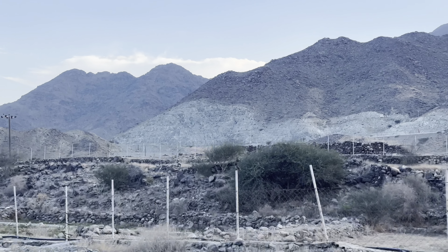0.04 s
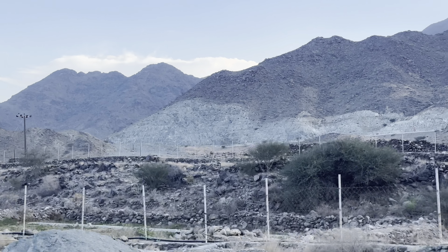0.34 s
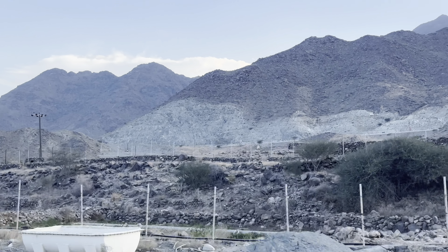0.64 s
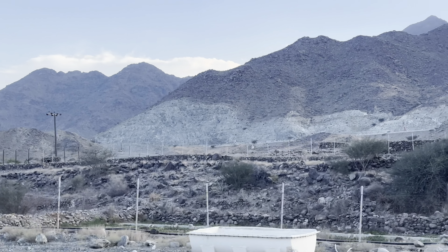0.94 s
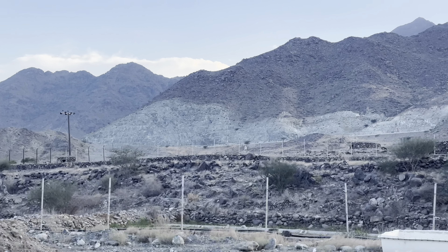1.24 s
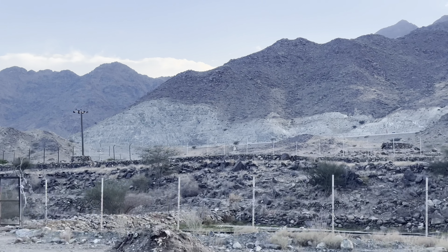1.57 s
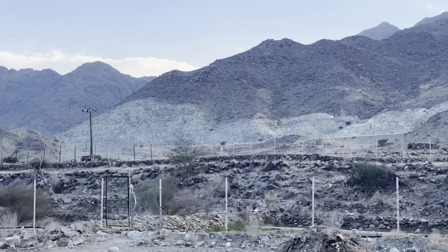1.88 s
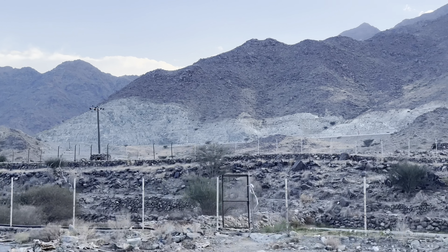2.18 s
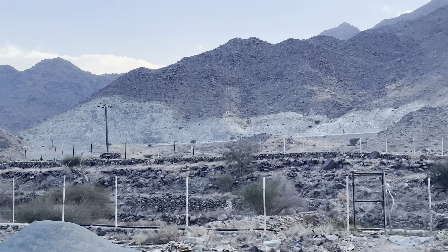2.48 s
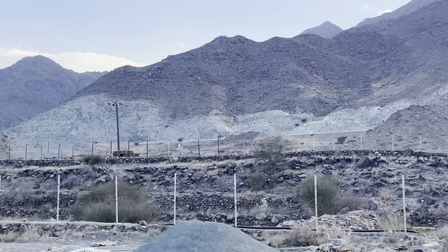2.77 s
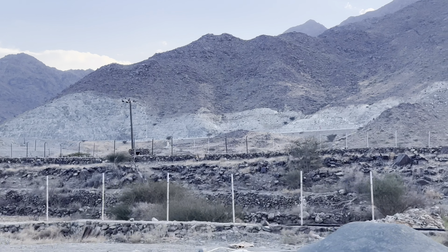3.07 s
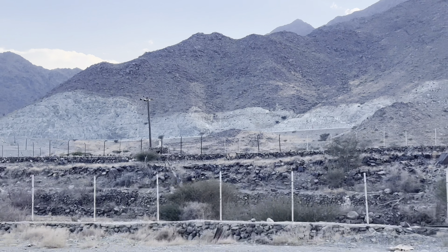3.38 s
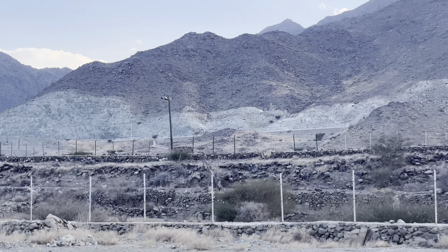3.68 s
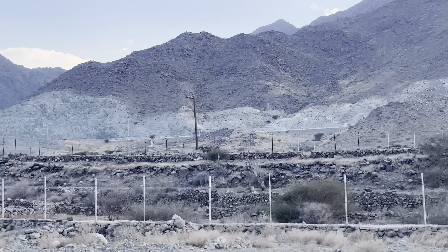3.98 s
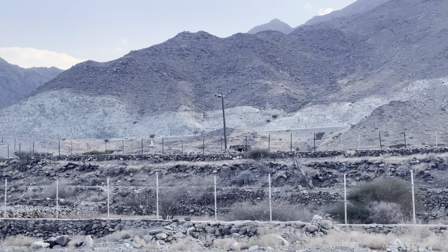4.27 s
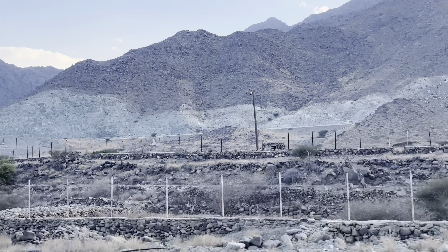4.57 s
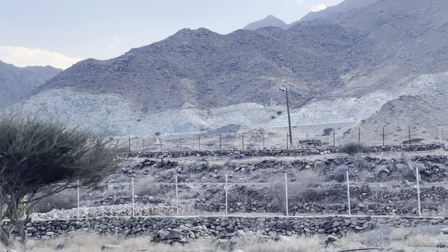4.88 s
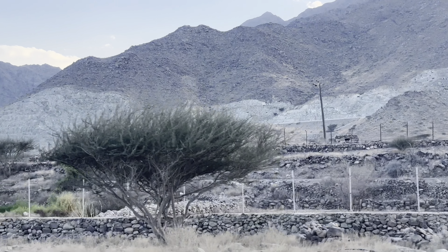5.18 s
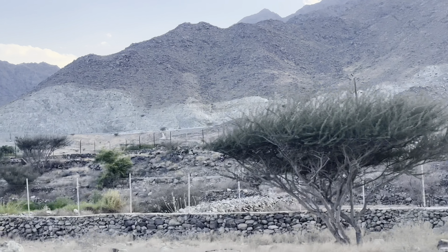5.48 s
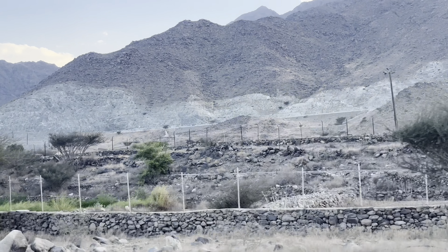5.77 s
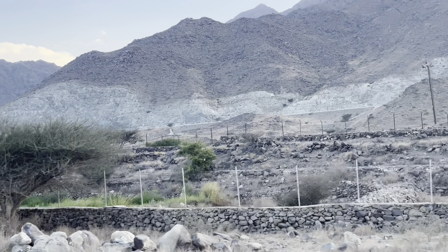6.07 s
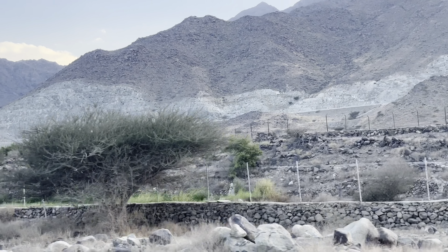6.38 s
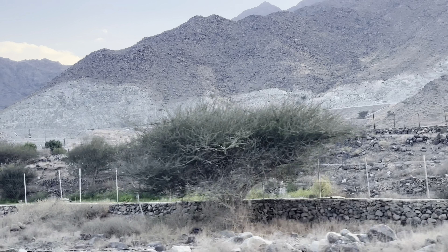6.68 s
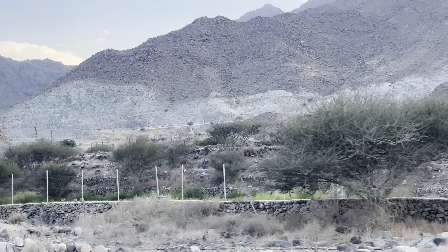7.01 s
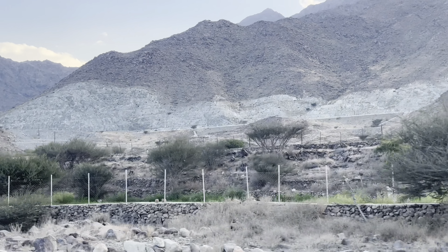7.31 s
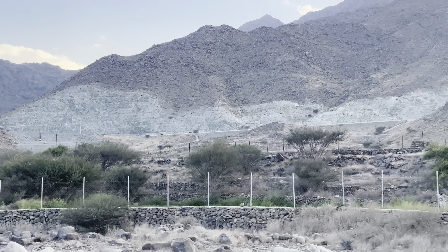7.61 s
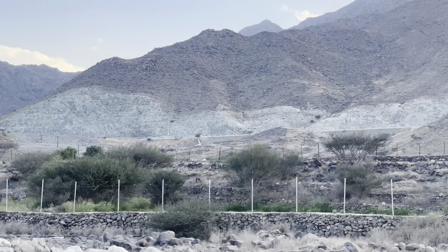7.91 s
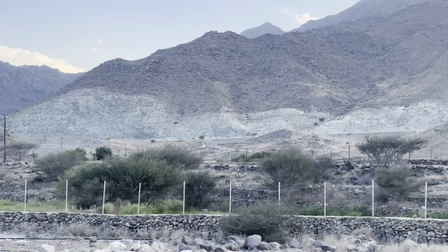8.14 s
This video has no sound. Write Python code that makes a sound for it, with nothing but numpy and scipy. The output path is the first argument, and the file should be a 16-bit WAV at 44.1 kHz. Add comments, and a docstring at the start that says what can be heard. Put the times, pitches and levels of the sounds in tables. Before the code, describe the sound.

Air rushes through an open car window, fluttering and thumping against the microphone, with faint road rumble underneath.

```python
"""Wind buffeting in a moving car

Turbulent air pours through an open window and over the two ports of a microphone. Each eddy is a
pressure fluctuation whose duration follows its size: large slow ones thump, middling ones roar, small
fast ones crack, and the rest merge into a ragged flutter. The car's steady rumble and hiss lie beneath."""
import sys
import numpy as np
from scipy import signal
from scipy.io import wavfile
from scipy.ndimage import uniform_filter1d

SR = 44100
rng = np.random.default_rng(int(sys.argv[2]) if len(sys.argv) > 2 else 0)


def store_pcm(level_fs):
    """Save levels as 16-bit WAV."""
    pcm = np.round(np.clip(level_fs, -1, 1) * 32767).astype(np.int16)
    wavfile.write(sys.argv[1], SR, np.atleast_2d(pcm).T)


N = 363809
BAND_HZ = 31 * 2 ** (np.arange(19) / 2)   # half-octave centres
OPPOSED = np.array([[1], [-1]])   # opposite signs at the left and right ports


def from_db(db):
    """Amplitude ratio of a level in decibels."""
    return 10 ** (np.asarray(db) / 20)


def rms_one(x):
    """Normalisation to unit root-mean-square amplitude."""
    return x / np.sqrt(np.mean(x ** 2) + 1e-20)


def at_hz(table, hz):
    """Interpolation on a logarithmic frequency axis."""
    frequencies, values = np.transpose(table)
    return np.interp(np.log(hz), np.log(frequencies), values)


def drift(corner_hz):
    """A slow random fluctuation: low-pass noise of unit rms."""
    pole = np.exp(-20 * np.pi * corner_hz / SR)   # at a tenth of the sample rate
    slow = signal.lfilter([1], [1, -2 * pole, pole * pole], rng.standard_normal(N // 10 + 4002))[4000:]
    return np.interp(np.arange(N) / 10, np.arange(len(slow)), rms_one(slow))


def swell(s, length, rise=.75):
    """An eddy's envelope, Gaussian rise and sech decay: (samples, time from peak, amplitude)."""
    at = np.arange(max(int((s - 2 * length) * SR), 0), min(int((s + 4 * length) * SR), N))
    t = at / SR - s
    growth = np.exp(-np.pi / 2 * (t / (rise * length)) ** 2)
    decay = 1 / np.cosh(np.pi / 2 * t / length)
    return at, t, np.where(t < 0, growth, decay)


def wind_gain(spectrum, hz, edge_hz=1900, db_per_octave=21):
    """Spectral roll-off: slow air makes little treble, so its spectrum falls steeply above an edge."""
    return from_db(at_hz(spectrum, hz) - db_per_octave * max(np.log2(hz / edge_hz), 0))


# Likeness of the sound at the two ports: (frequency [Hz], correlation [-])
PORT_CORRELATION = [(40, -0.1), (110, -0.18), (300, 1), (700, 0.51), (1400, 0.91), (3000, 1), (15000, .93)]
def band_noise(white, hz, strength):
    """Partial coherence: in-phase and antiphase noise mix into a half-octave stereo band."""
    alike = np.clip(at_hz(PORT_CORRELATION, hz), -1, 1)
    drive = np.sqrt((1 + alike) / 2) * white[0] + np.sqrt((1 - alike) / 2) * white[1] * OPPOSED
    low, high = hz * 2 ** np.array([-.25, .25])
    band = signal.butter(3, [low, high], "band", fs=SR, output="sos")
    return signal.sosfilt(band, drive * strength) * np.sqrt(SR / 2 / (high - low))


# Spectrum of tyres, engine and air in the cabin: (frequency [Hz], half-octave level [dB])
CABIN_SPECTRUM = [(31, -38), (62, -52), (125, -49), (250, -66), (550, -70), (1100, -61), (2000, -85),
                  (4200, -71), (8000, -81.5)]
def cabin_power(hz):
    """Stationary noise: the moving car supplies a constant power to each band."""
    return from_db(at_hz(CABIN_SPECTRUM, hz)) ** 2


def whiff(peak_s=1.11, level_db=-61, length_s=.05, low_hz=3500):
    """Amplitude-modulated high-pass noise: a thin hiss of air swells once."""
    at, _, bell = swell(peak_s, length_s)
    strength = np.zeros(N)
    strength[at] = from_db(level_db) * bell
    highpass = signal.butter(2, low_hz, "high", fs=SR, output="sos")
    return strength * signal.sosfilt(highpass, rng.standard_normal(N))


# Brief drops in the wind: (time [s], depth [dB], duration [s])
LULLS = [(0.133, 20, 0.046), (0.409, 17, 0.023), (0.616, 9, 0.018), (1.99, 16, 0.048), (4.536, 12.5, 0.066),
         (4.675, 13, 0.024), (4.99, 17, 0.033), (5.51, 26, 0.019), (7.348, 9, 0.055), (7.82, 8, 0.0081)]
def lull_db(s):
    """Intermittency: each lull is a Gaussian dip in level."""
    return -sum(depth * np.exp(-np.pi * ((s - centre) / length) ** 2) for centre, depth, length in LULLS)


def stirring_db(eddies, gather_s=0.0033, gather_db=2):
    """Clustering of turbulence: the flutter gathers around cracks and thumps and thins in the lulls."""
    near = np.zeros(N)
    for s, db, *_ in [*eddies, *THUMPS]:
        at, _, bell = swell(s, gather_s, rise=.3)
        near[at] += from_db(db) * bell
    return gather_db * np.tanh(near / near.mean()) + lull_db(np.arange(N) / SR)


# The draught through the window: (time [s], buffeting level [dB], roar level [dB], rasp level [dB])
DRAUGHT = [(0.0, -16.5, -26.5, -26.5), (0.35, -20.5, -32, -31), (0.85, -20, -27, -34),
           (1.03, -25.5, -29.5, -35.5), (1.6, -21, -33, -32), (2.0, -19, -27, -31.5), (2.35, -27, -31, -39),
           (2.85, -21, -34, -34.5), (3.3, -20.5, -28, -32), (3.701, -22, -28.5, -32.5),
           (4.45, -21, -25, -29), (4.62, -26, -29, -30), (5.198, -24.5, -28.5, -32.5),
           (5.85, -24.5, -26.5, -33), (5.998, -20.5, -29, -30), (6.6, -21.5, -24, -35),
           (7.25, -24, -32.5, -30), (7.65, -25, -32.5, -31), (8.25, -25, -27.5, -30.5)]
# Flutter spectrum, relative to the draught: (frequency [Hz], half-octave level [dB])
FLUTTER_SPECTRUM = [(31, -23), (44, -10.5), (68, -2), (125, -7.5), (235, -12), (410, -5.5), (1050, -10),
                    (1950, -14)]
# Modulation depth; the treble follows air speed most steeply: (frequency [Hz], level spread [dB])
FLUTTER_DEPTH = [(50, 2.8), (200, 4.6), (600, 4.9), (1500, 7), (3000, 9.5), (7000, 11)]
def flutter(hz, swirl, shove, stir_db, own_share=0.057):
    """Turbulent modulation of one band: the bass follows slow shoves, the treble the quick swirl."""
    times, *levels = np.transpose(DRAUGHT)
    level_db = [np.interp(np.log(hz), np.log([150, 480, 1600]), row) for row in np.transpose(levels)]
    draught = from_db(np.interp(np.arange(N) / SR, times, level_db))
    quick = np.interp(np.log(hz), np.log([125, 950]), [0, 1])
    speed = np.sqrt(quick) * swirl + np.sqrt(1 - quick) * shove + own_share * drift(min(hz / 4, 120))
    surge = from_db(at_hz(FLUTTER_DEPTH, hz) * np.minimum(rms_one(speed), 1.6))
    # the eddies share out the energy that the draught brings
    surge = surge / np.sqrt(uniform_filter1d(surge ** 2, int(.15 * SR)))
    return surge * rms_one(from_db(stir_db)) * draught * wind_gain(FLUTTER_SPECTRUM, hz)


# Middling eddies that roar past: (time [s], level [dB], duration [s])
GUSTS = [(0.305, -19, 0.019), (0.342, -17.5, 0.017), (0.507, -15.5, 0.019), (0.752, -23, 0.034),
         (0.925, -13, 0.0059), (1.143, -17, 0.0063), (2.335, -16.5, 0.017), (2.371, -21, 0.013),
         (2.393, -17, 0.01), (2.499, -13.5, 0.01), (2.576, -18.5, 0.013), (2.608, -17.5, 0.021),
         (2.735, -23, 0.01), (2.782, -10.5, 0.016), (2.851, -15.5, 0.015), (2.894, -13.5, 0.0076),
         (2.918, -12, 0.01), (3.012, -13.5, 0.0083), (3.059, -11, 0.0061), (3.208, -14, 0.006),
         (3.247, -11, 0.0066), (3.326, -12, 0.0061), (3.5, -19, 0.01), (3.646, -14.5, 0.007),
         (3.7, -22, 0.0075), (3.77, -18, 0.01), (3.821, -15.5, 0.013), (3.887, -17.5, 0.0099),
         (4, -18, 0.023), (4.09, -21.5, 0.013), (4.401, -9, 0.0035), (4.498, -11, 0.0057),
         (4.586, -16.5, 0.0077), (5.122, -13.5, 0.0092), (5.282, -19.5, 0.0077), (5.37, -23.5, 0.03),
         (5.486, -28, 0.02), (5.651, -20.5, 0.012), (5.682, -15, 0.0086), (5.856, -37, 0.0072),
         (5.985, -15.5, 0.023), (6.138, -20.5, 0.046), (6.296, -14.5, 0.0089), (6.364, -19, 0.031),
         (6.486, -22.5, 0.0075), (6.597, -15.5, 0.009), (6.656, -18, 0.012), (7.12, -21.5, 0.023),
         (7.194, -19.5, 0.0096), (7.256, -25, 0.0064), (7.299, -20.5, 0.03), (7.777, -17.5, 0.014),
         (7.948, -19, 0.0051), (7.995, -16, 0.0085)]
def gusts():
    """Convection: the envelope of the roar swells as the flow carries each eddy past."""
    strength = np.zeros(N)
    for s, db, length in GUSTS:
        at, _, bell = swell(s, length, rise=0.51)
        strength[at] += from_db(db) * bell
    return strength


def wakes(eddies, level_db=-1.0, delay_s=0.0022, stretch=0.86):
    """Turbulent wakes: the envelope of the air stirred around each crack peaks just after it."""
    strength = np.zeros(N)
    for s, db, length, _ in eddies:
        at, _, bell = swell(s + delay_s, max(stretch * length, .002), rise=9.8)
        strength[at] += from_db(db + level_db) * bell
    return strength


# Noise spectra, each relative to its gust, wake or thump: (frequency [Hz], half-octave level [dB])
GUST_SPECTRUM = [(31, -38), (150, -14.5), (330, -3.5), (620, -5.5), (1100, -25.5), (2000, -20.5)]
WAKE_SPECTRUM = [(31, -33), (90, -11), (250, -15.5), (550, -9), (1100, -23), (2500, -17)]
THUMP_SPECTRUM = [(31, -50), (70, -13.5), (220, -24.5), (480, -21.5), (1000, -30), (2000, -35.5)]
def eddy_noise_power(hz, gust, wake, thump):
    """Incoherent addition: gusts, wakes and the air torn off by thumps sum in power within a band."""
    sources = (gust, GUST_SPECTRUM), (wake, WAKE_SPECTRUM), (thump, THUMP_SPECTRUM)
    return sum((strength * wind_gain(spectrum, hz)) ** 2 for strength, spectrum in sources)


def shed_eddies(count=400, per_s=38, evenness=2.5, typical_s=0.0023, longest_s=.005, clear_s=0.0027):
    """Vortex shedding: the window edge releases lesser eddies at loosely even gaps; rows as in CRACKS."""
    gap, size, stretch, speed = rng.standard_normal((count, 4)).T
    intervals = np.exp((gap - .5 / np.sqrt(evenness)) / np.sqrt(evenness))   # log-normal, mean of one
    s = np.cumsum(intervals) / per_s
    times, _, _, rasp_db = np.transpose(DRAUGHT)
    over_rasp_db = 3 + 3.5 * np.minimum(size, 1)
    db = np.interp(s, times, rasp_db) + lull_db(s) + over_rasp_db
    length = np.minimum(typical_s * np.exp(0.45 * stretch), longest_s)
    bright_db = -12.5 + 3 * np.minimum(speed, 1.5)
    rows = np.transpose([s, db, length, bright_db])
    # a hard eddy leaves no room for a lesser one close to it
    clear = np.abs(s[:, None] - np.array(CRACKS)[:, 0]).min(axis=1) > clear_s
    return rows[clear & (s < N / SR)]


def splinters(level_db=-11):
    """Eddy break-up: a weaker, shorter tick trails each hard crack by 3 to 12 ms; rows as in CRACKS."""
    s, db, length, bright_db = np.transpose(CRACKS)
    delay_s = rng.uniform(.003, .012, len(s))
    rows = np.transpose([s + delay_s, db + level_db, length / 2, bright_db])
    return rows[rows[:, 0] < N / SR]


# Hard, fast eddies at the ports: (time [s], level [dB], duration [s], brightness [dB])
CRACKS = [(0.0811, -20, 0.005, -5), (0.1036, -19, 0.005, -7), (0.1487, -15, 0.002, -4),
          (0.1906, -23, 0.002, -4), (0.2265, -17, 0.003, -6), (0.2415, -20, 0.003, -9),
          (0.2912, -21, 0.003, -18), (0.3157, -18, 0.004, -7), (0.3484, -22, 0.004, -4),
          (0.3753, -17, 0.001, -12), (0.4252, -15, 0.002, -3), (0.4763, -21, 0.003, -11),
          (0.5396, -15, 0.002, -11), (0.6019, -21, 0.005, -6), (0.6452, -19, 0.005, -8),
          (0.767, -16, 0.006, -5), (0.8137, -13, 0.004, -7), (0.8466, -12, 0.004, -1),
          (0.8719, -18, 0.001, -3), (1.1518, -19, 0.005, -14), (1.1743, -21, 0.002, -3),
          (1.1994, -14, 0.001, 2), (1.2424, -20, 0.002, -7), (1.345, -20, 0.001, -5),
          (1.4279, -16, 0.003, -6), (1.4831, -12, 0.001, -12), (1.5039, -23, 0.004, 0),
          (1.6143, -21, 0.002, -8), (1.6305, -20, 0.005, -8), (1.7274, -25, 0.004, -6),
          (1.7434, -17, 0.003, -7), (1.7733, -23, 0.005, -12), (1.9318, -18, 0.002, -3),
          (2.0822, -17, 0.001, 0), (2.1361, -16, 0.002, -7), (2.1721, -26, 0.004, -4),
          (2.2689, -17, 0.003, -11), (2.3443, -16, 0.005, -12), (2.3768, -15, 0.002, -7),
          (2.403, -19, 0.007, -8), (2.6063, -18, 0.006, -7), (2.6528, -12, 0.002, -10),
          (2.6679, -19, 0.003, -6), (2.7151, -22, 0.003, -10), (2.7403, -20, 0.006, -14),
          (2.7504, -19, 0.004, -13), (2.782, -13, 0.003, -7), (2.7959, -21, 0.006, -10),
          (2.8258, -21, 0.005, -12), (2.8598, -23, 0.005, -11), (2.9129, -17, 0.005, -12),
          (2.9598, -21, 0.004, -12), (3.0218, -21, 0.005, -7), (3.0435, -14, 0.004, -5),
          (3.0648, -16, 0.005, -4), (3.0959, -18, 0.005, -10), (3.1308, -10, 0.002, -4),
          (3.1499, -16, 0.004, -11), (3.1704, -12, 0.004, -10), (3.2073, -18, 0.005, -8),
          (3.2508, -13, 0.003, -7), (3.2796, -16, 0.002, -13), (3.296, -20, 0.006, -5),
          (3.3358, -16, 0.007, -8), (3.3708, -14, 0.004, -7), (3.4222, -20, 0.002, -10),
          (3.4558, -21, 0.003, -5), (3.481, -16, 0.002, -15), (3.4938, -15, 0.004, -9),
          (3.5278, -17, 0.006, -8), (3.5933, -25, 0.006, -6), (3.6068, -23, 0.007, -7),
          (3.6525, -17, 0.005, -9), (3.6941, -18, 0.003, -13), (3.7061, -12, 0.005, -6),
          (3.7271, -14, 0.002, -12), (3.8359, -15, 0.002, -9), (3.8738, -16, 0.002, -7),
          (3.8852, -17, 0.004, -8), (3.8967, -14, 0.003, -7), (3.9648, -18, 0.003, -11),
          (4.0033, -14, 0.003, -11), (4.0159, -16, 0.003, -5), (4.0443, -20, 0.003, -7),
          (4.0553, -22, 0.005, -10), (4.0956, -16, 0.007, -5), (4.141, -17, 0.003, -9),
          (4.1614, -18, 0.003, -11), (4.2214, -21, 0.004, -13), (4.239, -19, 0.003, -14),
          (4.3801, -21, 0.004, -11), (4.4003, -13, 0.004, -8), (4.4148, -14, 0.003, -5),
          (4.461, -15, 0.003, -7), (4.4846, -15, 0.002, -11), (4.7251, -24, 0.004, -10),
          (4.7915, -16, 0.002, -8), (4.8445, -15, 0.002, -10), (4.9206, -15, 0.003, 1),
          (5.028, -13, 0.002, -12), (5.0459, -16, 0.002, -4), (5.1089, -21, 0.003, -7),
          (5.126, -14, 0.004, -10), (5.1788, -21, 0.005, -3), (5.2094, -18, 0.002, -7),
          (5.3384, -12, 0.002, -1), (5.3515, -22, 0.003, -3), (5.3775, -21, 0.004, -7),
          (5.4013, -22, 0.004, -9), (5.4552, -13, 0.002, -9), (5.4904, -15, 0.004, -12),
          (5.5481, -19, 0.003, -10), (5.6245, -19, 0.002, -2), (5.6881, -14, 0.003, -3),
          (5.8186, -19, 0.003, -6), (5.8392, -21, 0.004, -7), (5.8739, -21, 0.003, -6),
          (5.9274, -19, 0.004, -9), (5.9507, -16, 0.004, -6), (5.9648, -19, 0.004, -4),
          (5.9971, -15, 0.005, -9), (6.0089, -20, 0.004, -11), (6.0649, -17, 0.003, 0),
          (6.0818, -15, 0.004, -7), (6.1486, -13, 0.004, -4), (6.1874, -18, 0.004, -6),
          (6.2489, -22, 0.007, -12), (6.3053, -14, 0.005, -12), (6.3709, -15, 0.003, -10),
          (6.3886, -19, 0.005, -10), (6.4131, -23, 0.005, -7), (6.4459, -17, 0.002, -14),
          (6.4629, -17, 0.001, -1), (6.4802, -20, 0.005, -4), (6.494, -15, 0.001, -7),
          (6.5133, -19, 0.002, -2), (6.5631, -20, 0.004, -12), (6.6084, -12, 0.004, -9),
          (6.6688, -14, 0.002, -7), (6.6806, -17, 0.003, -8), (6.7229, -17, 0.004, -4),
          (6.7639, -22, 0.003, -5), (6.8252, -15, 0.003, -8), (6.8356, -19, 0.003, -12),
          (6.8616, -13, 0.002, -7), (6.9357, -19, 0.003, -14), (6.9518, -23, 0.004, -8),
          (6.9673, -18, 0.002, -13), (6.9761, -13, 0.002, -7), (7.0207, -17, 0.005, -3),
          (7.0658, -24, 0.004, -9), (7.1032, -18, 0.002, -5), (7.1237, -16, 0.004, -10),
          (7.1469, -15, 0.002, -5), (7.1995, -18, 0.004, -5), (7.2158, -19, 0.003, -8),
          (7.2527, -19, 0.004, -14), (7.312, -14, 0.003, -8), (7.4115, -20, 0.003, -9),
          (7.4248, -18, 0.002, -1), (7.4766, -11, 0.002, -4), (7.4922, -15, 0.003, -8),
          (7.5517, -21, 0.006, -3), (7.6246, -16, 0.002, -11), (7.6695, -14, 0.001, -1),
          (7.6793, -26, 0.004, -1), (7.7474, -17, 0.002, -8), (7.7839, -14, 0.001, -2),
          (7.8909, -17, 0.004, -6), (7.9883, -25, 0.003, -4), (8.0065, -10, 0.002, -8),
          (8.0408, -22, 0.003, -5), (8.0833, -20, 0.004, -6), (8.1321, -19, 0.004, -13),
          (8.1704, -20, 0.003, -4), (8.2273, -14, 0.001, -9)]
# The octaves of a crack:
# (frequency [Hz], level [dB], level slope [dB/dB], brightness slope [dB/dB], duration ratio [-])
CRACK_OCTAVES = [(804, -3.5, 1, -0.05, 1.2), (1640, -2.5, 1, 0.23, 0.99), (3180, -2.5, 1, 1.05, 0.96),
                 (6240, -9, 1.39, 1.64, 0.88), (13450, -5.5, 1.74, 1.63, 0.65)]
def cracks(eddies, apart=0.15, skirt=0.42, width=0.52, body_hz=1900, jerk_db=3.5):
    """Broadband transients: a fast eddy is a burst of jerks, shorter and rougher in higher octaves."""
    out = np.zeros((2, N))
    jerk = np.minimum(drift(730), 1.3)
    common, own = rng.standard_normal((2, 2, 1, N))
    body = signal.butter(1, body_hz, fs=SR, output="sos")
    pressure = signal.sosfilt(body, common + apart * own * OPPOSED)
    for k, (hz, band_db, level_slope, bright_slope, ratio) in enumerate(CRACK_OCTAVES):
        octave = signal.butter(3, hz * 2 ** np.array([-.5, .5]), "band", fs=SR, output="sos")
        rasp = signal.sosfilt(octave, pressure[k % 2] * from_db(jerk_db / ratio * jerk))
        for s, db, length, bright_db in eddies:
            at, t, bell = swell(s, ratio * length, rise=.6)
            core = np.exp(-(t / (width * ratio * length)) ** 4)
            burst = rms_one(rasp[:, at] * (core + skirt * bell))
            gain = from_db(band_db + level_slope * db + bright_slope * bright_db)
            out[:, at] += gain * burst * np.sqrt(length * SR / len(at))
    return out


# Large eddies that shove the diaphragms: (time [s], level [dB], duration [s], frequency [Hz])
THUMPS = [(0.347, -15, 0.019, 120), (0.553, -3.5, 0.0066, 115), (0.607, -9.5, 0.0035, 138),
          (0.775, -16.5, 0.019, 113), (0.817, -13.5, 0.025, 82), (0.846, -17, 0.007, 92),
          (1.0, -15.5, 0.012, 72), (1.159, -8.5, 0.014, 119), (1.341, -7.5, 0.0043, 109),
          (1.943, -15.5, 0.0079, 96), (2.095, -12.5, 0.0097, 155), (2.343, -12.5, 0.016, 172),
          (2.39, -11.5, 0.0086, 112), (2.581, -1, 0.0051, 160), (2.614, -5.5, 0.012, 111),
          (2.79, -3.5, 0.014, 126), (2.839, -11, 0.01, 96), (2.902, -10, 0.0088, 136),
          (3.031, -8.5, 0.012, 85), (3.071, -13.5, 0.0095, 93.5), (3.217, -12.5, 0.0034, 109),
          (3.292, -15, 0.024, 91), (3.391, -4, 0.008, 127), (3.461, -10, 0.0053, 132),
          (3.715, -10, 0.0078, 95), (4.033, -13.5, 0.0054, 88), (4.412, -9, 0.0046, 120),
          (4.516, -13.5, 0.011, 93), (4.853, -15, 0.0068, 99), (5.092, -8.5, 0.01, 110),
          (5.297, -12.5, 0.014, 99), (5.695, -13.5, 0.014, 119), (5.969, -12, 0.022, 101),
          (6.002, -10, 0.0098, 116), (6.049, -8.5, 0.0053, 109), (6.144, -7, 0.0034, 123),
          (6.199, -12.5, 0.0075, 84), (6.311, -7.5, 0.01, 112), (6.375, -8, 0.025, 122),
          (6.612, -7, 0.015, 106), (6.681, -7.5, 0.0064, 118), (6.873, -17, 0.017, 75.4),
          (7.214, -10, 0.014, 78), (7.317, -2.5, 0.009, 121), (7.902, -13, 0.0078, 96),
          (8.019, -16.5, 0.043, 79.5), (8.083, -11.5, 0.02, 83)]
def thumps(level_db=2.5, sag=0.61, wander=0.25, lean_db=3.0, lead_s=0.0013, phase_spread_rad=0.46):
    """Forced motion: a large eddy swings each diaphragm in uneven, slowing cycles: (sound, envelope)."""
    out, strength = np.zeros((2, N)), np.zeros(N)
    uneven = np.exp(wander * np.array([drift(95), drift(180)]))
    for (s, db, length, hz), (turn, apart, lean) in zip(THUMPS, rng.standard_normal((len(THUMPS), 3))):
        at, t, bell = swell(s - lead_s, length)
        pitch = hz * np.exp(-sag * t / length) * uneven[:, at]
        phase = 2 * np.pi * np.cumsum(pitch, axis=1) / SR
        phase_at_peak = np.pi * turn + phase_spread_rad * apart * OPPOSED
        phase = phase - phase[:, [np.argmax(bell)]] + phase_at_peak
        balance_db = (lean_db + lean) * OPPOSED / 2
        out[:, at] += from_db(db + level_db + balance_db) * bell * np.sin(phase)
        strength[at] += from_db(db) * bell
    return out, strength


def scene(swirl_hz=75, shove_hz=22, grit_db=3.0, lean_db=-0.06):
    """Superposition: wind and cabin noise add in power by band; thumps, cracks and hiss ride on top."""
    swirl, shove = drift(swirl_hz), drift(shove_hz)
    grit = rms_one(from_db(grit_db * drift(420)))   # the flow tears in tiny jerks inside each eddy
    white = rng.standard_normal((3, 2, N))
    eddies = np.vstack([CRACKS, splinters(), shed_eddies()])
    out, thump = thumps()
    gust, wake, stir_db = gusts(), wakes(eddies), stirring_db(eddies)
    for k, hz in enumerate(BAND_HZ):
        wind_power = flutter(hz, swirl, shove, stir_db) ** 2 + eddy_noise_power(hz, gust, wake, thump)
        strength = np.sqrt(cabin_power(hz) + wind_power * grit ** 2)
        out += band_noise(white[k % len(white)], hz, strength)
    return (out + cracks(eddies) + whiff()) * from_db(lean_db * OPPOSED / 2)


def resonance(hz, width_hz):
    """A damped resonance: the denominator of its two-pole filter."""
    radius = np.exp(-np.pi * width_hz / SR)
    return np.array([1, -2 * radius * np.cos(2 * np.pi * hz / SR), radius * radius])


def record(dry, low_cut_hz=40, ring_db=4.0, port_hz=10400, leak_db=-12, hiss_db=-80, cutoff_hz=16900):
    """Microphone response: bass cut, port resonance, saturation, dulled top, self-noise, phase shift."""
    x = signal.sosfilt(signal.butter(4, low_cut_hz, "high", fs=SR, output="sos"), dry)
    ring = resonance(7000, width_hz=2400)
    x = x + from_db(ring_db) * signal.lfilter((1 - ring[2]) / 2 * np.array([1, 0, -1]), ring, x)
    x = x / (1 + x ** 4) ** (1 / 4)   # peaks are rounded
    dull = signal.sosfilt(signal.butter(12, port_hz, fs=SR, output="sos"), x)
    top = signal.sosfilt(signal.butter(8, port_hz, "high", fs=SR, output="sos"), x)
    left, right = dull + from_db(leak_db) * top + from_db(hiss_db) * rng.standard_normal((2, N))
    twist = resonance(8300, width_hz=1200)
    right = signal.lfilter(twist[::-1], twist, right)   # all-pass: the ports fall out of step
    return signal.sosfilt(signal.cheby2(12, 70, cutoff_hz, fs=SR, output="sos"), [left, right])


dry = scene()
out = record(dry)
store_pcm(out)
```